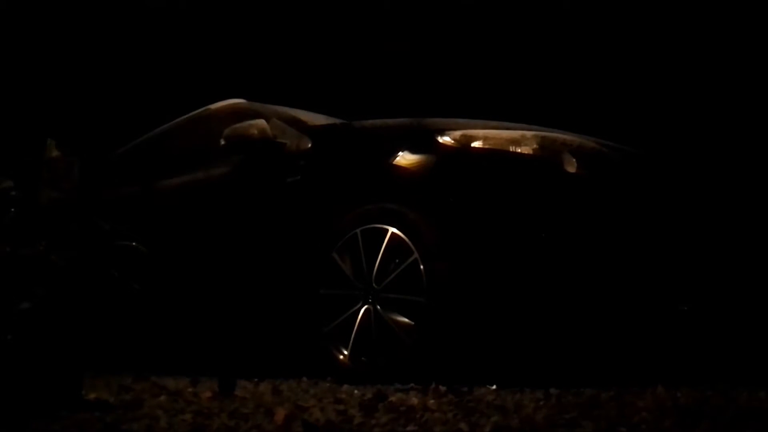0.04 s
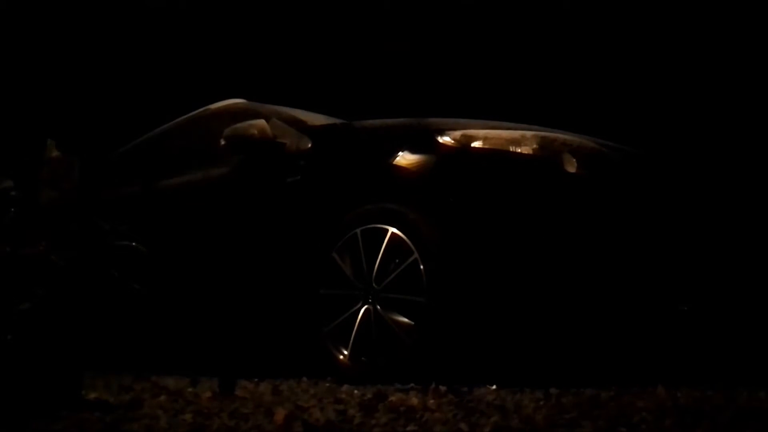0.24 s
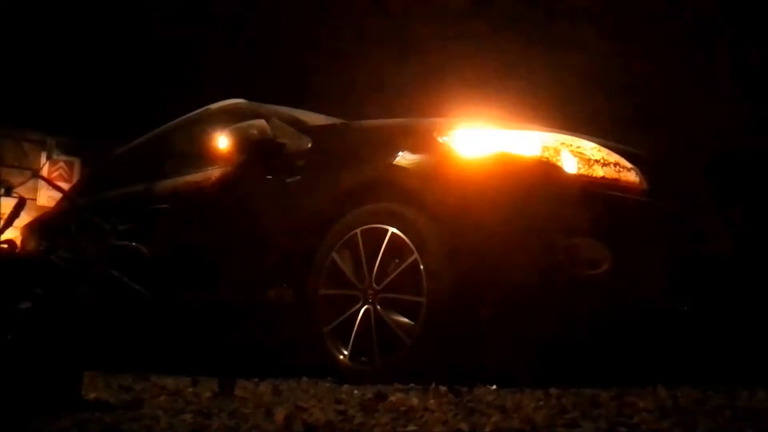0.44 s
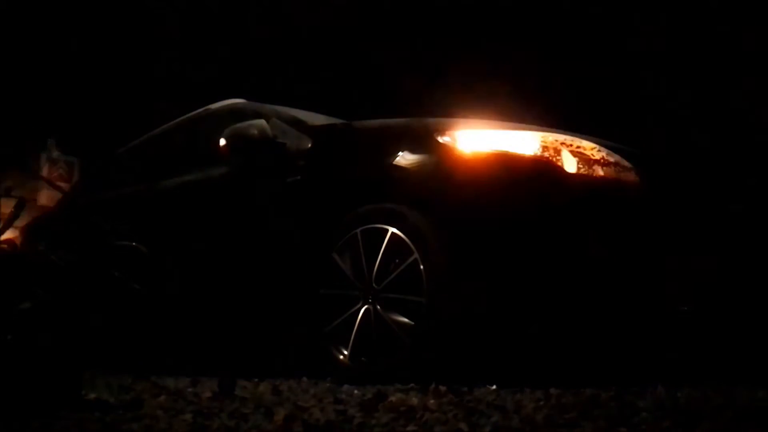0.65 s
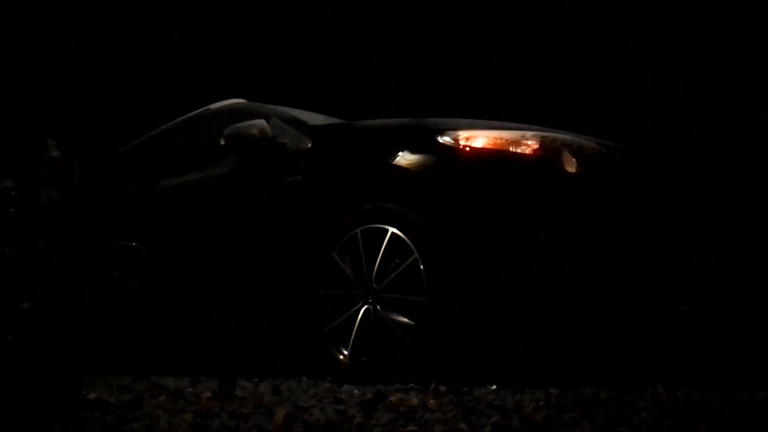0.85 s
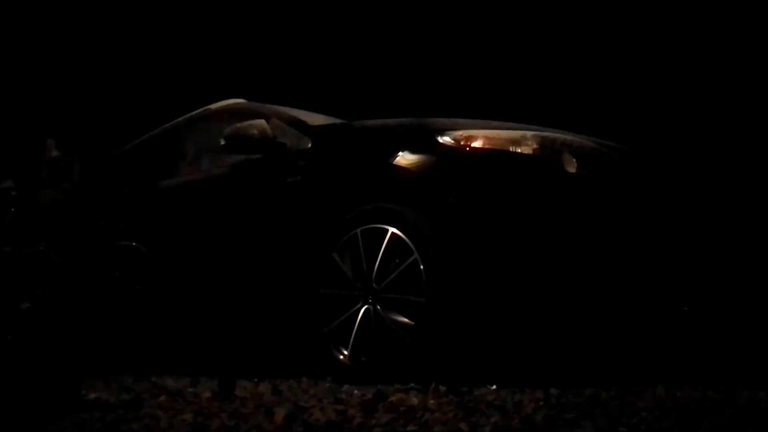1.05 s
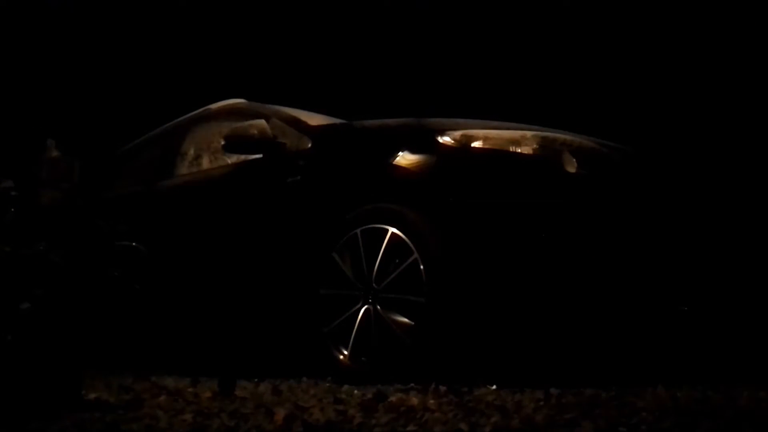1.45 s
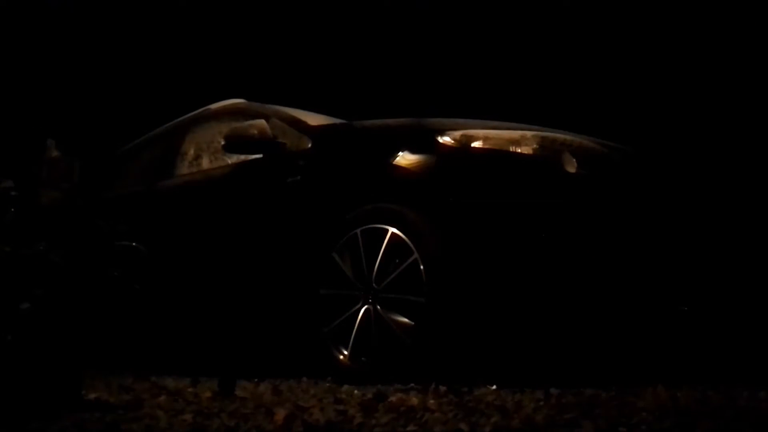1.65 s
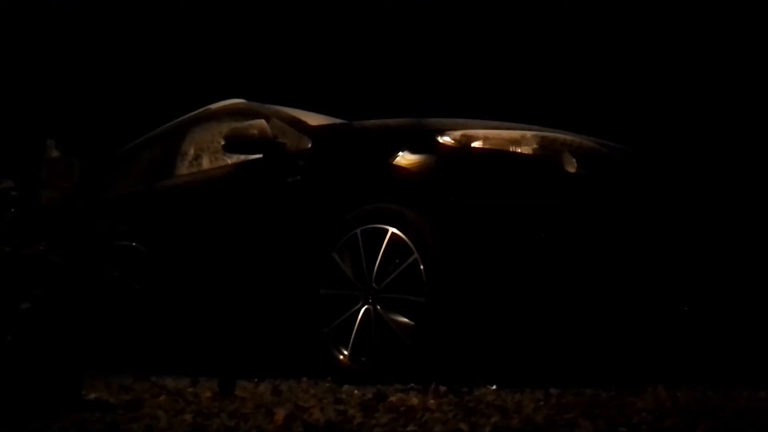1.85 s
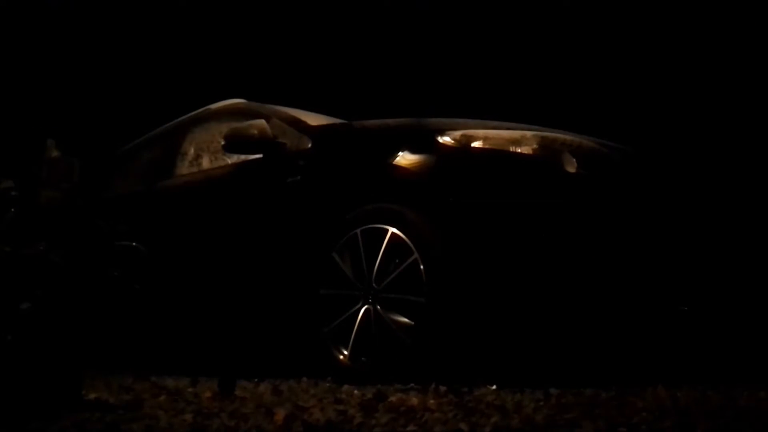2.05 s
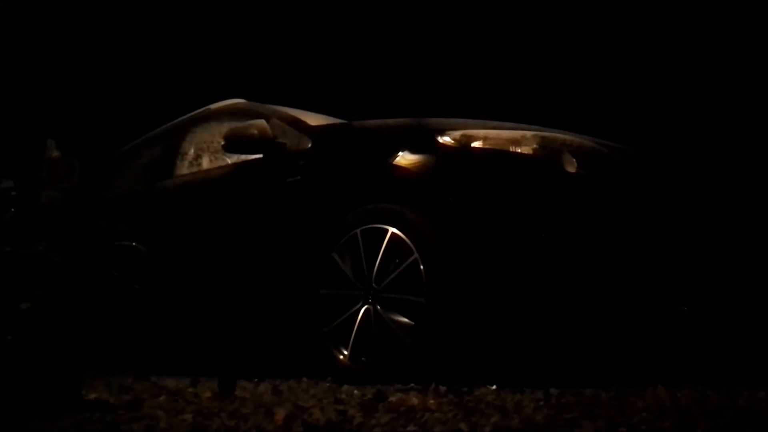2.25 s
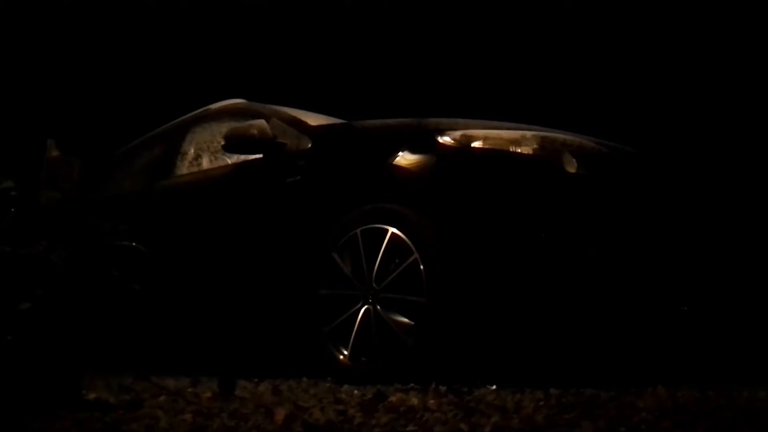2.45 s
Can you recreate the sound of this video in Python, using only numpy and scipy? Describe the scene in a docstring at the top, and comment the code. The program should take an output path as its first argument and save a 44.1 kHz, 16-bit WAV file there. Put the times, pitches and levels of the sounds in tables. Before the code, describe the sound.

A car unlocks with a sharp clunk before its door opens and thumps closed.

```python
"""A parked car is unlocked at night, heard from a few metres away.
Small motors spin up, throw the lock bolts with a clunk and run back. Then a door is unlatched, swings
and is pulled shut, and the car's body settles. The knocks mix ringing tones with fading noise, as
metal parts strike and shake the panels. Behind it lie a low outdoor rumble, faint hiss and ticking."""
import sys
import numpy as np
from scipy import signal
from scipy.fft import rfft, irfft
from scipy.io import wavfile

SR = 44100
rng = np.random.default_rng(int(sys.argv[2]) if len(sys.argv) > 2 else 0)


def wav_out(sig):
    """Save sig, one row per channel (or a flat mono array), as 16-bit PCM at SR to the path in sys.argv[1]."""
    wavfile.write(sys.argv[1], SR, np.round(np.clip(np.atleast_2d(sig).T, -1, 1) * 32767).astype(np.int16))


N = 114660
TIME = np.arange(N) / SR
BAND_EDGES_HZ = 22 * 2 ** (np.arange(29) / 2.98)   # about three bands to an octave

# Night air and hiss. Each row: frequency in Hz, relative strength in dB.
NIGHT_SPECTRUM = [(25, -3.5), (60, -0.5), (107, -2), (200, -8), (301, -13), (632, -25.5), (1440, -29.5),
                  (2310, -33), (6000, -34.5), (14000, -35)]
# How alike left and right are. Each row: frequency in Hz, likeness from 0 (unrelated) to 1 (the same).
NIGHT_LIKENESS = [(60, 0.96), (150, 1), (370, 0), (900, 0), (14000, 0)]
CAR_LIKENESS = [(100, 1), (250, 0.86), (500, 0.78), (1200, 0.35), (4000, 0.12), (12000, 0.14)]
# How far the sound leans to the left. Each row: frequency in Hz, left level minus right level in dB.
NIGHT_LEAN = [(200, 0), (900, 1.5), (3600, -1.5), (14000, 2.5)]
CAR_LEAN = [(150, 0), (400, 0.5), (800, 5), (1500, 1.5), (2700, -6.5), (5500, -1), (8500, 2), (11000, 15.5)]

# Soft bumps of the car's body. Each row: start in seconds, level in dB.
BUMPS = [(1.000, -63), (1.065, -59), (1.635, -59.5), (2.26, -62), (2.311, -68)]
# Their dull noise. Each row: frequency in Hz, relative strength in dB.
BUMP_SPECTRUM = [(60, -8.5), (110, 0.5), (200, 2.5), (320, -13.5), (800, -19), (1500, -36.5), (2600, -29.5),
                 (5000, -47)]
# The body rocks. Each row: time of the peak in seconds, level in dB, pitch in Hz, fade time in seconds.
SWAYS = [(1.21, -38.5, 59, 0.027), (1.206, -43, 98.7, 0.029), (1.295, -45.5, 88.5, 0.022),
         (1.666, -49, 64.4, 0.05), (1.784, -57, 67, 0.074), (1.886, -49.5, 73, 0.03),
         (2.286, -50, 91.7, 0.026), (2.319, -53, 59.5, 0.062)]
# One hollow plink. Its row: start in seconds, level in dB.
PLINKS = [(0.884, -49)]
# Its modes, the tones a struck thing rings with. Ring time is how long a sound takes to fade by 60 dB.
# Each row: pitch in Hz, relative level in dB, ring time in seconds.
PLINK_MODES = [(752, 0, 0.078), (843, -1, 0.11), (897, -6.5, 0.047), (984, -8.5, 0.08)]

# The door knocks as it opens, then meets its seals and rebounds as it shuts.
# Each row: start in seconds, noise level in dB, ring level in dB, Hz above which the noise is dulled.
OPENING_KNOCKS = [(1.186, -42.5, -55, 1000), (1.196, -43.5, -50, 3500), (1.2315, -38.5, -35.5, 1300),
                  (1.254, -48.5, -59, 1800), (1.296, -50.5, -56, 450), (1.410, -55.5, -65, 987)]
SHUTTING_KNOCKS = [(1.690, -35.5, -35, 2900), (1.717, -42.5, -43.5, 1000), (1.762, -50, -41.5, 1200),
                   (1.856, -52.5, -72, 200)]
# The handle's spring pings, the stay (the arm that holds the door open) drops into its notches, and
# the catch snaps shut and rattles. Each row: start in seconds, level in dB.
HANDLE_PINGS = [(1.18, -53)]
STAY_DROPS = [(1.410, -52.5), (1.460, -64)]
CATCH_SNAPS = [(1.690, -56), (1.7, -50.5), (1.750, -68), (1.772, -72.5), (1.839, -75)]
# The tones of the door's parts. Each row: pitch in Hz, relative level in dB, ring time in seconds.
HANDLE_MODES = [(1300, -2, 0.077), (1370, -0.65, .1)]
LATCH_MODES = [(184, -9.5, 0.085), (268, -12.5, 0.27), (405.4, 4, 0.075), (467, 3.5, 0.057),
               (600, -21.5, 0.46), (740, -10, 0.22)]
STAY_MODES = [(199, -15, 0.16), (298.5, -5, 0.21), (338.4, 2, 0.17), (607, -12, .14)]
PANEL_MODES = [(116.3, -3.5, 0.5), (139.6, -8, 0.37), (193.6, -3, 0.23), (237.7, -4.5, .17),
               (304.2, -10.5, 0.23), (453, -21.5, 0.24), (853, -20, 0.068)]
CATCH_MODES = [(1567, -4, 0.19), (1720, -10, 0.11), (2595, 6.5, 0.057), (2867, 1, 0.081), (2970, 0, 0.11),
               (3620, -17, 0.1), (3800, -19, 0.19), (5180, -12, 0.068), (5300, -18, 0.049)]
# The noise of the door's knocks and its catch. Each row: frequency in Hz, relative strength in dB.
OPENING_SPECTRUM = [(50, -9), (100, -0.5), (200, 2), (400, -3.5), (800, -8.5), (1400, -18), (2000, -22),
                    (2800, -23.5), (3800, -60), (6000, -35), (12000, -36)]
SHUTTING_SPECTRUM = [(50, -17), (120, 5.5), (250, 3), (400, -14), (800, -12.5), (1600, -28), (2200, -38),
                     (5000, -31), (12000, -43)]
CATCH_SPECTRUM = [(800, -9), (1600, 4), (2150, -14), (2800, 10), (3700, -5), (4400, -30), (5400, -21),
                  (7000, -33), (14000, -18)]
# How long each kind of rattle lasts. Each row: frequency in Hz, ring time in seconds.
BUMP_RING_TIMES = [(100, 0.34), (2000, 0.18)]
CATCH_RING_TIMES = [(1500, 0.14), (8000, 0.05)]
DOOR_RING_TIMES = [(80, 0.27), (300, 0.32), (1000, 0.21), (4000, 0.18)]
LOCK_RING_TIMES = [(200, 0.32), (700, 0.17), (1500, 0.13), (4000, 0.15), (12000, 0.09)]

# The lock motors run. Each row: start in seconds, rise in seconds, fall in seconds, level in dB.
MOTOR_RUNS = [(0.218, 0.024, 0.048, -44), (0.511, 0.033, 0.066, -56.5)]
# The gears' whirr, and the rattle of locks and panels. Each row: frequency in Hz, relative strength in dB.
MOTOR_SPECTRUM = [(150, -6), (350, 2.5), (800, 1), (1100, 0), (1800, -1), (2500, -17.5), (5000, -19),
                  (7000, -47), (14000, -38)]
LOCK_SPECTRUM = [(60, -27), (120, -14.5), (230, -8.5), (400, -6.5), (600, -5), (1000, -2.5), (1400, -8),
                 (1900, -11.5), (3000, -24.5), (4000, -22), (5500, -27.5), (7000, -27.5), (9000, -31),
                 (12000, -30.5), (14000, -25)]
# The bolts reach their stops, one door after another.
# Each row: start in seconds, noise level in dB, ring level in dB, Hz above which the noise is dulled.
BOLT_KNOCKS = [(0.2458, -30.5, -38.5, 7000), (0.2500, -32, -34, 9000), (0.2565, -34.5, -42, 14000),
               (0.2677, -44, -53, 16000), (0.2750, -39.5, -43, 20000), (0.2880, -59, -57, 20000),
               (0.2969, -50, -56.5, 12000), (0.390, -63.5, -69.5, 1500)]
# The first bolt strikes bare metal, and the door skins (the outer metal sheets) boom.
# Each row: start in seconds, level in dB.
METAL_SNAPS = [(0.2471, -39)]
SKIN_BOOMS = [(0.251, -41.5), (0.2692, -36), (0.289, -48), (0.391, -56.5)]
# The tones of bolts, metal and skins. Each row: pitch in Hz, relative level in dB, ring time in seconds.
BOLT_MODES = [(380.7, -1, 0.14), (615, -1.5, 0.19), (728.8, -6.5, 0.17), (820, -4, .15), (982.3, -6.5, .15),
              (1200, -19, 0.073), (1214.5, -9.5, 0.2), (1320, -7, 0.15), (1468, -11, 0.1), (1837, -8, 0.18)]
METAL_MODES = [(822, 2, 0.11), (986, 9, 0.1), (1022, 6.5, .1), (2110, -10, 0.09), (2575, -1, 0.091),
               (2704, -8, 0.12), (3576, -4.5, .09), (3810, -5, .09), (4020, -6.5, .1), (4694, -13, 0.075),
               (5400, 0.5, 0.023), (5590, -4, 0.032), (7046, -9.5, .05)]
SKIN_MODES = [(100, -18.5, .25), (196, -4, 0.23), (228.6, -6, 0.24), (258.8, -1, 0.26), (311.5, -5.5, .24)]
# How far the locks lag on the right. Each row: frequency in Hz, lag in radians (6.28 is one cycle).
LOCK_LAG = [(50, .1), (180, .55), (350, 1.4), (700, 1.7), (1400, 1.8), (2800, 2.4), (5600, 1.1),
            (12000, 1.5)]


def from_db(db):
    """Turn decibels into a number to multiply the sound by."""
    return 10 ** (np.asarray(db) / 20)


def at_hz(table, hz):
    """Read between a table's rows, giving every octave the same room."""
    row_hz, values = np.transpose(table)
    return np.interp(np.log(hz), np.log(row_hz), values)


def clicks(times, sizes):
    """Put a click, one sample long, at each time."""
    return np.bincount((np.asarray(times) * SR).astype(int), sizes, N)[:N] + 1e-18


def lean(table, hz):
    """Give the left and right volume at one frequency."""
    return from_db(at_hz(table, hz) * np.array([[.5], [-.5]]))


def noise_bands(spectrum, likeness=CAR_LIKENESS, balance=CAR_LEAN):
    """Give narrow bands of stereo noise as (Hz, band); their total power is about 1."""
    low, high = BAND_EDGES_HZ[:-1], BAND_EDGES_HZ[1:]
    centres = np.sqrt(low * high)
    power = from_db(at_hz(spectrum, centres)) ** 2 * (high - low)
    white = rng.standard_normal((2, 2, N + SR // 10))
    for k, hz in enumerate(centres):
        band_filter = signal.butter(2, [low[k], high[k]], "band", fs=SR, output="sos")
        pair = signal.sosfilt(band_filter, white[k % 2])[:, -N:]
        shared, side = pair / pair.std() * np.sqrt(power[k] / power.sum() / 2)
        alike = np.clip(at_hz(likeness, hz), -1, 1)
        stereo = np.sqrt(1 + alike) * shared + np.sqrt(1 - alike) * side * [[1], [-1]]
        yield hz, stereo * lean(balance, hz)


def rattle(times, db, spectrum, ring_times, attack_s, bright_hz=np.inf):
    """Blows stir so many panel tones that they blur into noise; each band fades at its own rate."""
    out, rise = 0, np.exp(-1 / (attack_s * SR))
    for hz, band in noise_bands(spectrum):
        blows = clicks(times, from_db(db) ** 2 / (1 + (hz / bright_hz) ** 4))
        decay = np.exp(-2 * np.log(1000) / (at_hz(ring_times, hz) * SR))
        energy = signal.lfilter([1], [1, -decay], blows)
        softened = signal.lfilter([1 - rise], [1, -rise], energy)
        out = out + band * np.sqrt(softened)
    return out


def ring(times, db, modes):
    """Blows set clear tones ringing, each a little louder or softer by chance."""
    out, luck_db = 0, rng.standard_normal((len(times), len(modes)))
    for k, (hz, mode_db, ring_s) in enumerate(modes):
        decay = np.exp(-np.log(1000) / (ring_s * SR))
        turn = 2 * np.pi * hz / SR
        blows = clicks(times, from_db(db + mode_db + luck_db[:, k]))
        tone = signal.lfilter([0, np.sin(turn)], [1, -2 * decay * np.cos(turn), decay ** 2], blows)
        out = out + (-1) ** k * lean(CAR_LEAN, hz) * tone   # every other tone starts downward
    return out


def knocks(blows, modes, spectrum, ring_times, attack_s):
    """A struck part rings and rattles at once."""
    times, noise_db, ring_db, bright_hz = np.transpose(blows)
    tones = ring(times, ring_db, modes)
    return tones + rattle(times, noise_db, spectrum, ring_times, attack_s, bright_hz)


def night_air(level_db=-64):
    """A steady, low outdoor rumble with a faint hiss above it."""
    bands = noise_bands(NIGHT_SPECTRUM, NIGHT_LIKENESS, NIGHT_LEAN)
    return from_db(level_db) * sum(band for hz, band in bands)


def electrical_ticks(first_s=0.06, every_s=0.08, ramp_s=0.0024, level_db=-61.5, spread_db=0.5):
    """Faint, regular spits of electrical noise, on the left only."""
    loudness = 0
    for peak_s in np.arange(first_s, TIME[-1], every_s):
        triangle = np.maximum(1 - np.abs(TIME - peak_s) / ramp_s, 0)
        loudness = loudness + from_db(level_db + spread_db * rng.standard_normal()) * triangle
    treble = signal.butter(1, [5500, 13000], "band", fs=SR, output="sos")
    return signal.sosfilt(treble, loudness * rng.standard_normal(N) + 1e-18) * [[1], [0]]


def body_bumps():
    """The car's shell gives dull little bumps before and after the door moves."""
    return rattle(*np.transpose(BUMPS), BUMP_SPECTRUM, BUMP_RING_TIMES, attack_s=0.0045)


def body_sways():
    """The car's body rocks and pushes the air in a few deep, rounded waves."""
    out = 0
    for peak_s, db, hz, fade_s in SWAYS:
        swell = np.exp(-((TIME - peak_s) / fade_s) ** 2)
        out = out + from_db(db) * swell * np.cos(2 * np.pi * hz * (TIME - peak_s))
    return out


def plink():
    """A small hollow tap sounds before the door opens."""
    return ring(*np.transpose(PLINKS), PLINK_MODES)


def door_opening():
    """The handle is pulled, the latch lets go and the door swings into its stay."""
    latch = knocks(OPENING_KNOCKS, LATCH_MODES, OPENING_SPECTRUM, DOOR_RING_TIMES, attack_s=0.0013)
    handle = ring(*np.transpose(HANDLE_PINGS), HANDLE_MODES)
    stay = ring(*np.transpose(STAY_DROPS), STAY_MODES)
    return latch + handle + stay


def door_shutting(catch_ring_db=-2, catch_noise_db=-4):
    """The door's panel booms softly, with the metal click of the catch on top."""
    boom = knocks(SHUTTING_KNOCKS, PANEL_MODES, SHUTTING_SPECTRUM, DOOR_RING_TIMES, attack_s=0.00048)
    times, db = np.transpose(CATCH_SNAPS)
    click = rattle(times, db + catch_noise_db, CATCH_SPECTRUM, CATCH_RING_TIMES, attack_s=0.002)
    return boom + click + ring(times, db + catch_ring_db, CATCH_MODES)


def lock_motors():
    """Small geared motors whirr louder as they spin up, then fade as they coast to rest."""
    loudness = 0
    for start, rise, fall, db in MOTOR_RUNS:
        speed = np.interp(TIME, [start, start + rise, start + rise + fall], [0, 1, 0])
        loudness = loudness + from_db(db) * speed ** 1.35
    return loudness * sum(band for hz, band in noise_bands(MOTOR_SPECTRUM))


def lock_bolts():
    """The bolts slam home in quick succession, and the door skins answer with a hollow boom."""
    clack = knocks(BOLT_KNOCKS, BOLT_MODES, LOCK_SPECTRUM, LOCK_RING_TIMES, attack_s=0.00084)
    snap = ring(*np.transpose(METAL_SNAPS), METAL_MODES)
    boom = ring(*np.transpose(SKIN_BOOMS), SKIN_MODES)
    return clack + snap + boom


def locks():
    """The locks sound from all round the car, so each frequency has its own delay on the right."""
    left, right = lock_bolts() + lock_motors()
    hz = np.maximum(np.fft.rfftfreq(N, 1 / SR), 1)
    lag = np.exp(-1j * at_hz(LOCK_LAG, hz))
    return np.array([left, irfft(rfft(right) * lag, N)])


def scene(door_lag_s=0.000557):
    """Mix night, door and locks. The door is a little to the left, so the right side hears it later."""
    left, right = door_opening() + door_shutting() + body_sways() + body_bumps() + plink()
    door = np.array([left, np.interp(TIME - door_lag_s, TIME, right)])
    return night_air() + door + locks()


def record(dry, bass_cut_hz=30, treble_cut_hz=14250):
    """Thin the deepest bass, add the ticks and cut the highest treble."""
    bass_cut = signal.butter(1, bass_cut_hz, "high", fs=SR, output="sos")
    treble_cut = signal.ellip(10, .2, 70, treble_cut_hz, fs=SR, output="sos")
    thinned = signal.sosfilt(bass_cut, dry)
    return signal.sosfilt(treble_cut, thinned + electrical_ticks())


dry = scene()
out = record(dry)
wav_out(out)
```